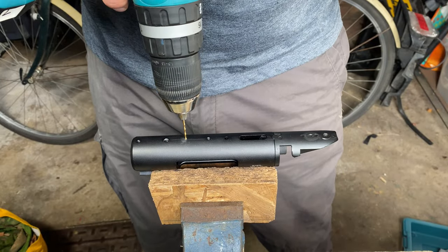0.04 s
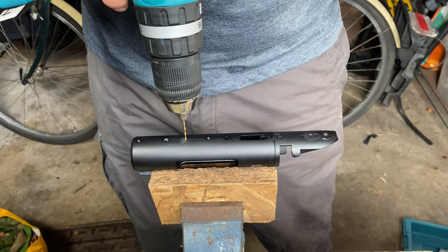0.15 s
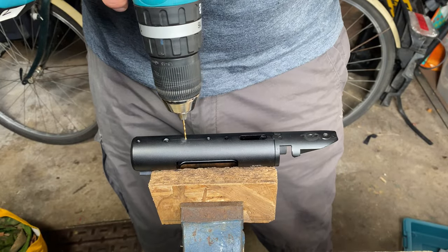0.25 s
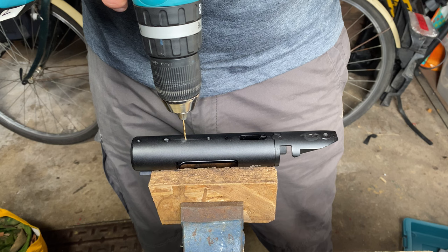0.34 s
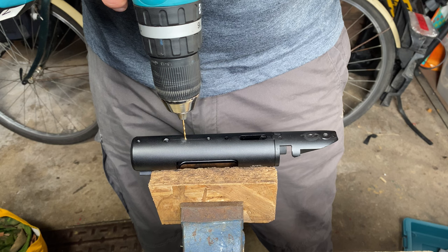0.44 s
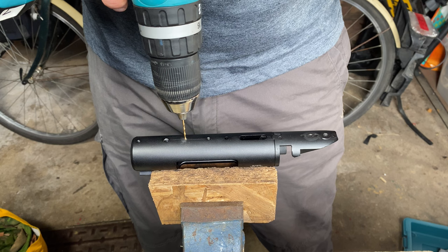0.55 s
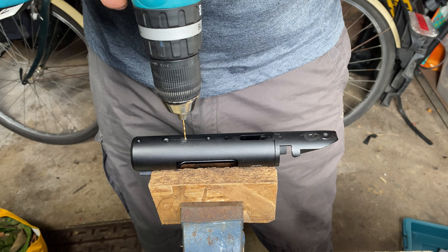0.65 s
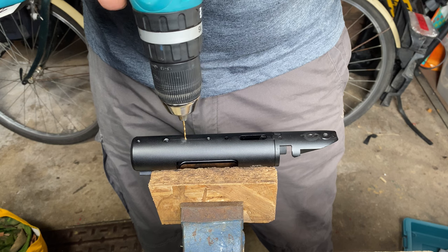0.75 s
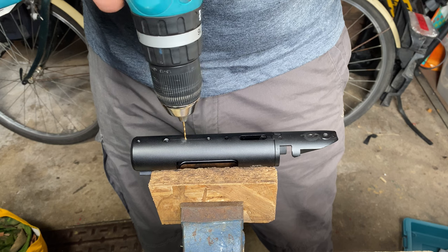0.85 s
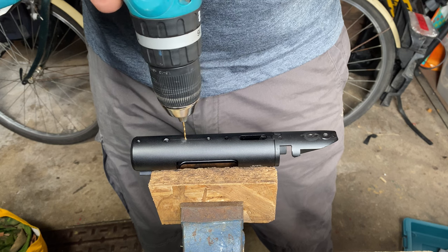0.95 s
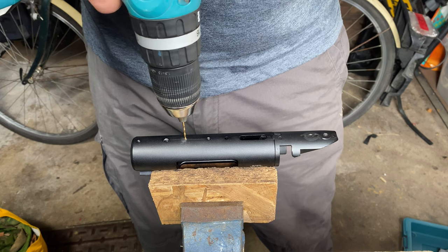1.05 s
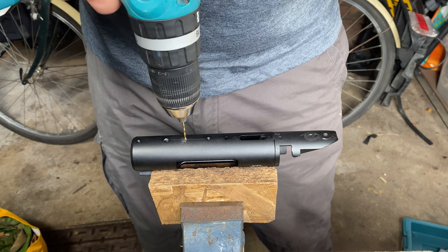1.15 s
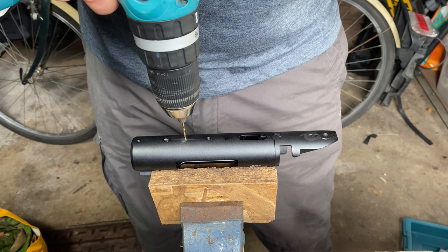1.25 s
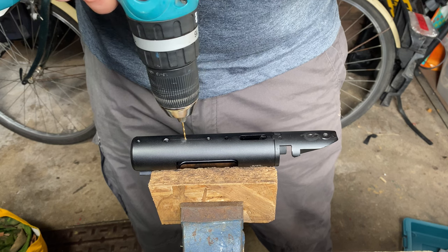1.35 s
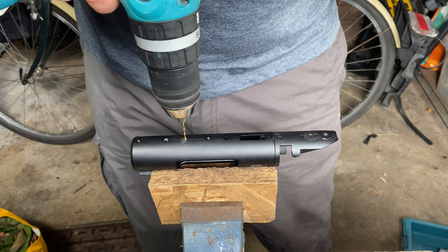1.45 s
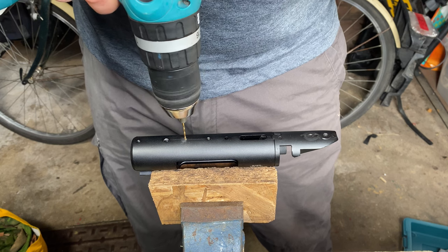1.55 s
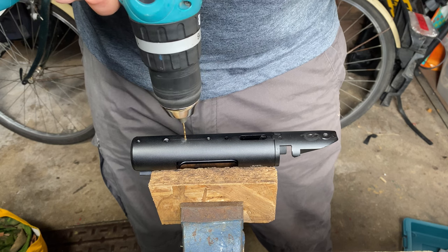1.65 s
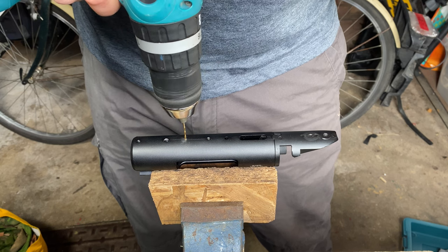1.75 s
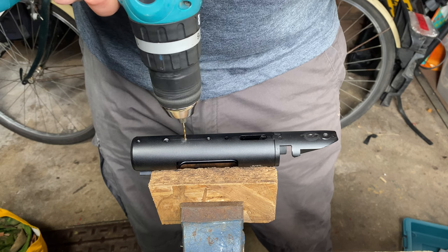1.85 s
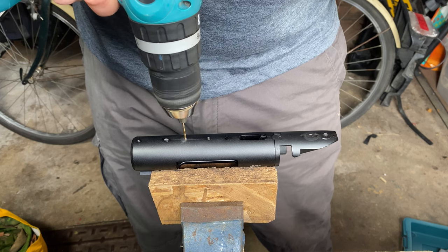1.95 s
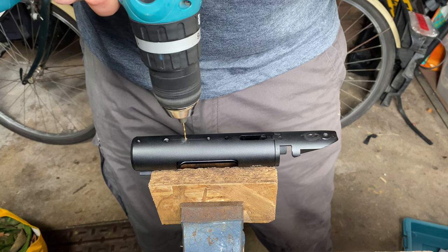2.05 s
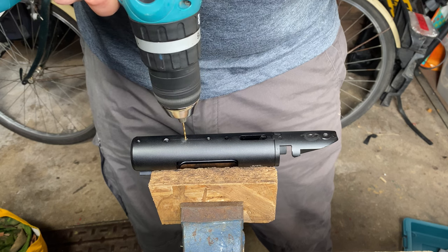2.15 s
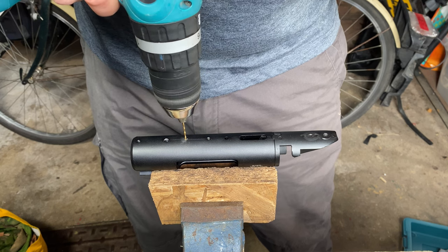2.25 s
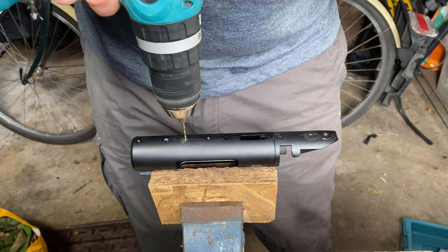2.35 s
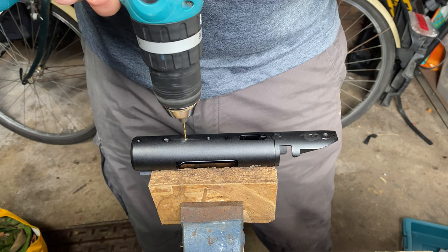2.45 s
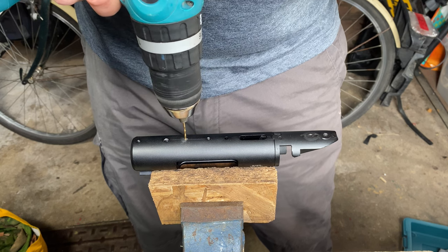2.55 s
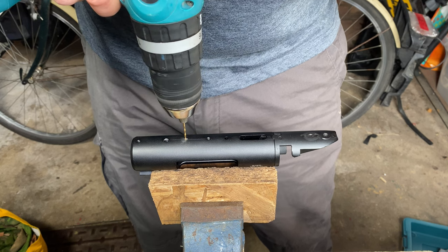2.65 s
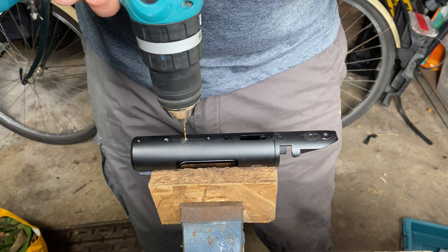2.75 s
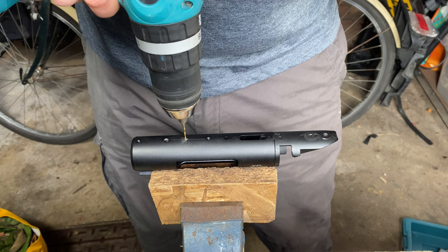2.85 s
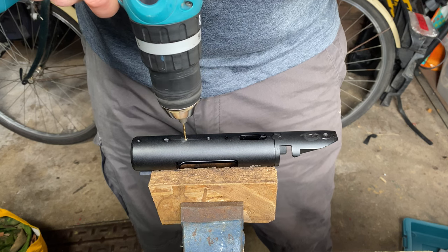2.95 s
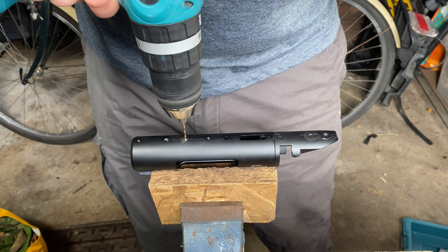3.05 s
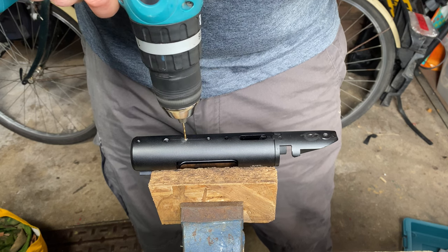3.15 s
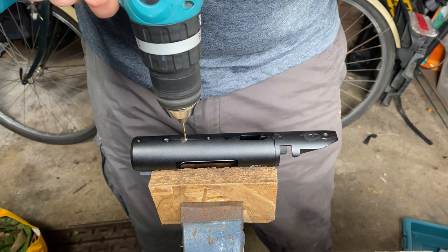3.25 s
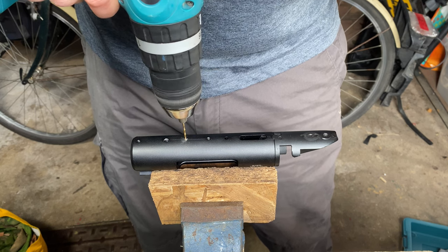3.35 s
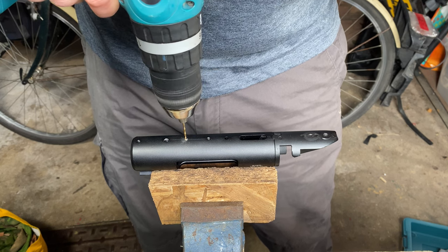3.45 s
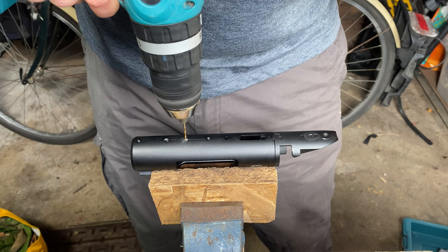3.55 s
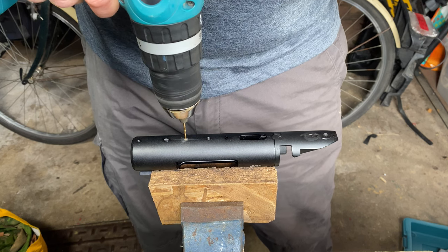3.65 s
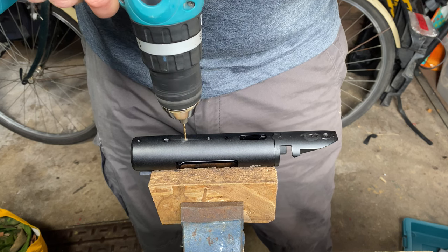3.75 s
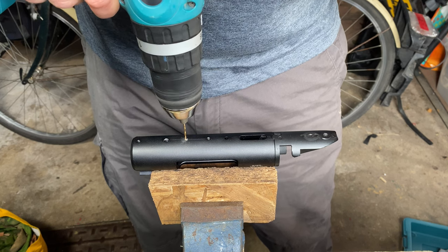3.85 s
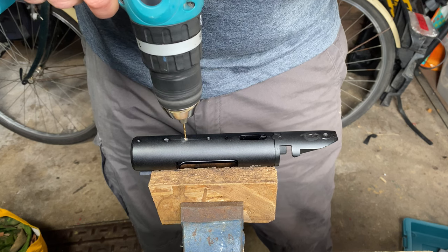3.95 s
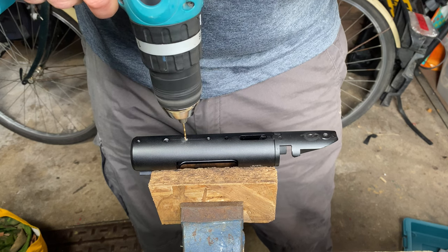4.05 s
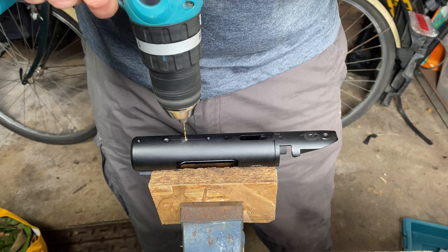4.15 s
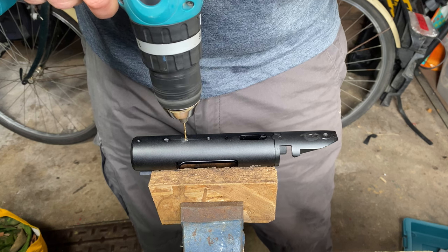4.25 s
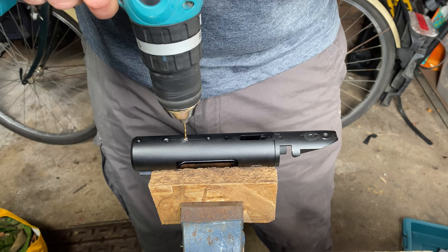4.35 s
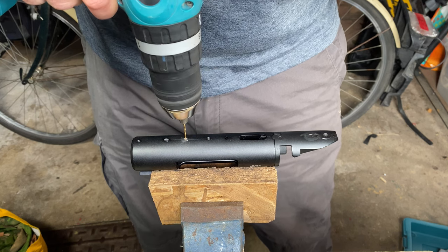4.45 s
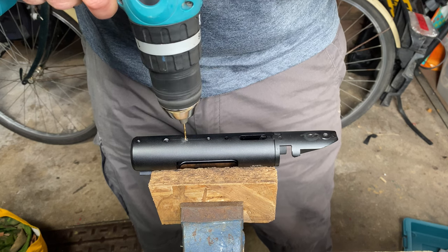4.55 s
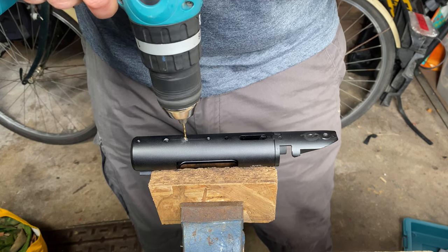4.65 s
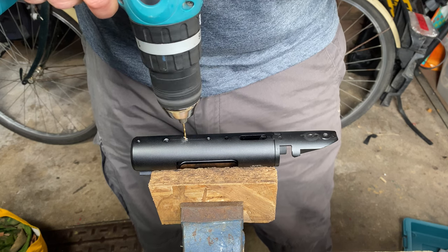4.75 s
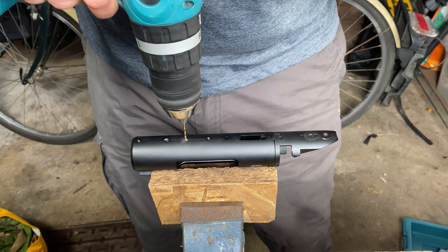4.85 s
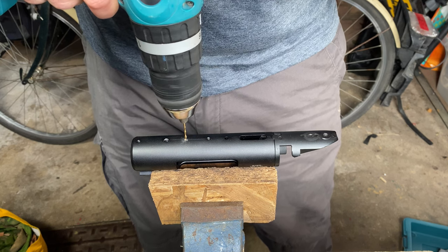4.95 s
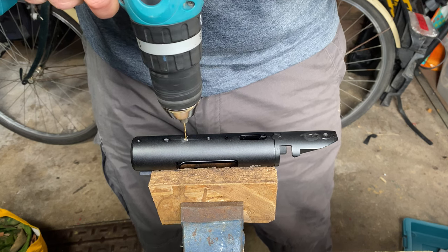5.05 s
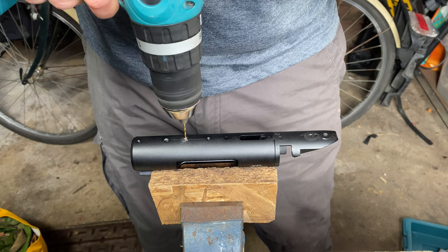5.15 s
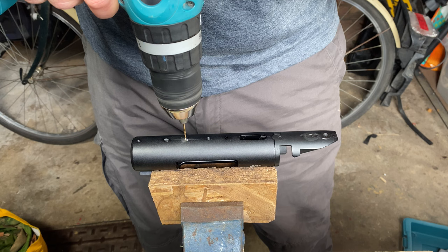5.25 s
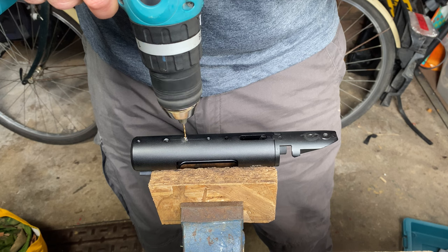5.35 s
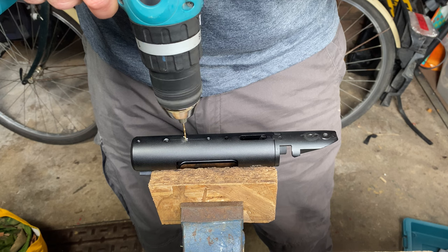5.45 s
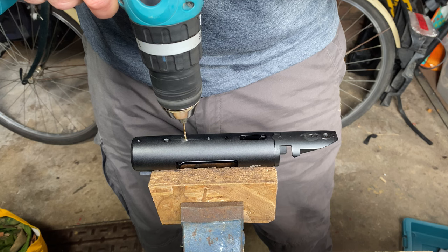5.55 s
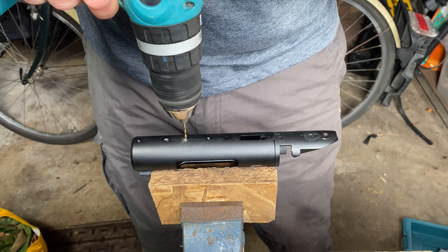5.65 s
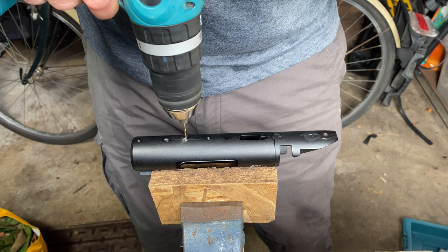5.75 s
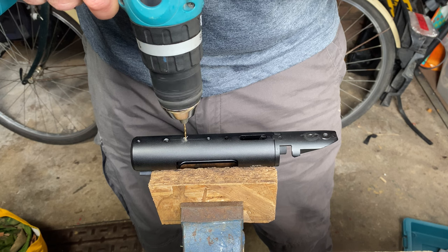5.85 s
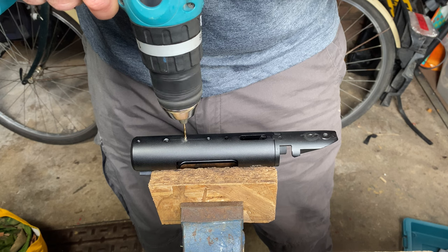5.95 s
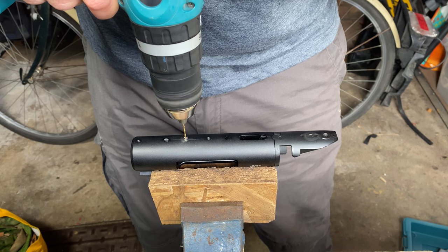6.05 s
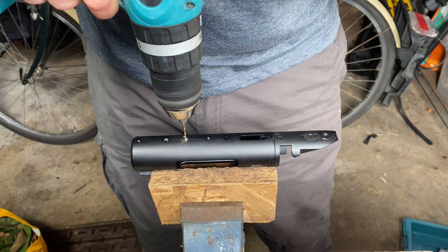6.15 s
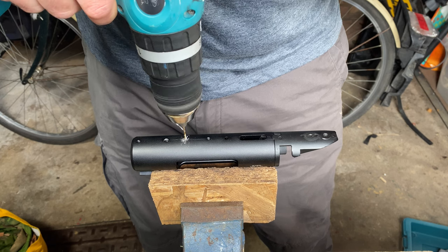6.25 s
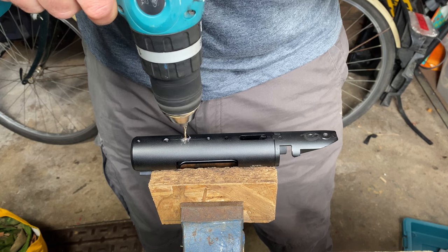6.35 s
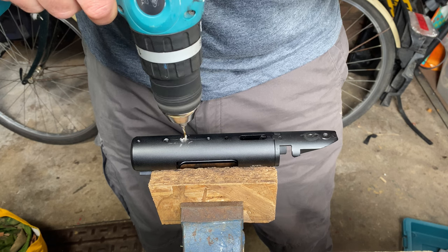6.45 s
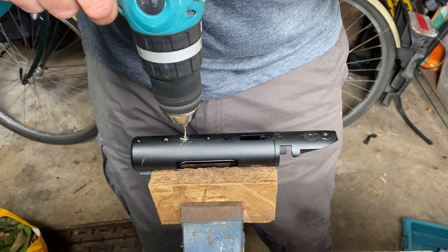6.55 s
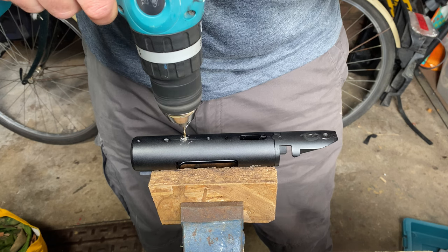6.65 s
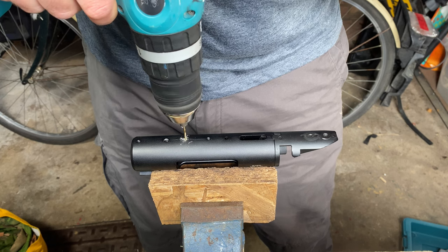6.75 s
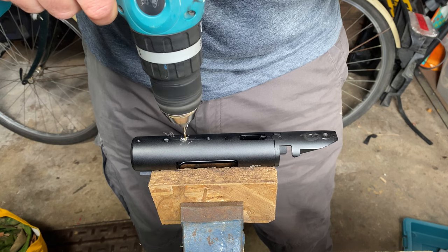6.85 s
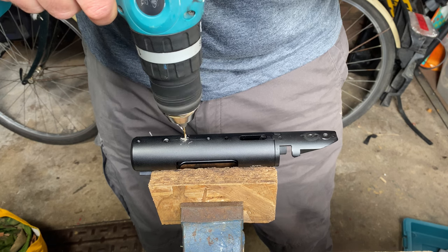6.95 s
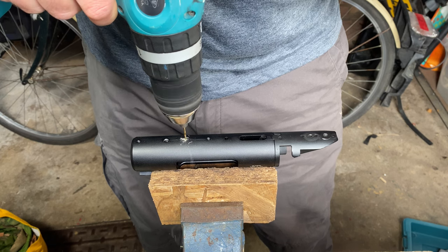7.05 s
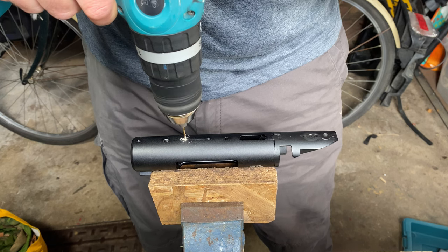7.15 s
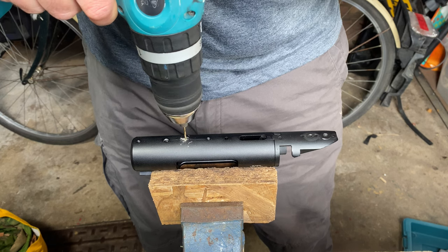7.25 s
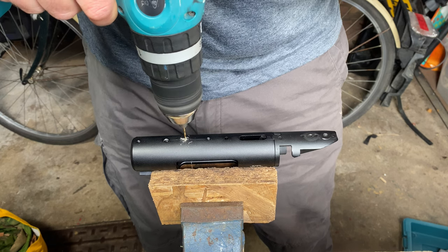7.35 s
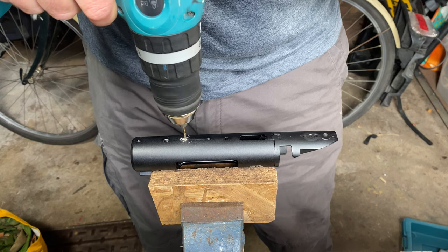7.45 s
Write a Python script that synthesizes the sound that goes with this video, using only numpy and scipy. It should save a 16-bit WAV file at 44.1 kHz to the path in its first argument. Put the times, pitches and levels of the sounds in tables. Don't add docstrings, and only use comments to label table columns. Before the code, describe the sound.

A cordless drill bores into a steel part in three speed steps, from quiet gritty buzz to bright screaming whir, over a faint workshop hum.

```python
import sys
import numpy as np
from scipy import signal
from scipy.fft import rfft, irfft, next_fast_len
from scipy.io import wavfile
from scipy.ndimage import uniform_filter1d, map_coordinates

SR = 44100
rng = np.random.default_rng(int(sys.argv[2]) if len(sys.argv) > 2 else 0)


def transcribe(signal):
    frames = np.atleast_2d(signal).T
    limited = np.clip(frames, -1, 1)
    pcm = np.round(limited * 32767).astype(np.int16)
    wavfile.write(sys.argv[1], SR, pcm)


def voltage_ratio(level):
    return 10 ** (np.asarray(level, float) / 20)


N = 330485
T = np.arange(N) / SR
START = 1.3052
STEP_S = [START, 3.44, 6.222]


def unit(x):
    return x / np.sqrt(np.mean(x ** 2) + 1e-20)


def along(points, hz):
    f, v = np.transpose(points)
    return np.interp(np.log(hz + 1), np.log(f + 1), v)


def curve(rows, axis=1):
    return np.interp(T, np.array(rows)[:, 0], np.array(rows)[:, axis])


def stepped(values):
    step = np.searchsorted(STEP_S, T) - 1
    return np.asarray(values)[np.clip(step, 0, 2)]


def wobble(rate, order=3):
    knots = rng.standard_normal(int(N * rate / SR) + 4)
    return map_coordinates(knots, [T * rate], order=order)


def filtered(x, response):
    m = next_fast_len(N + 8192)
    return irfft(rfft(x, m) * response(np.fft.rfftfreq(m, 1 / SR)), m)[..., :N]


def peak(f, hz, width):
    return 1j * f * width / (hz * hz - f * f + 1j * f * width)


def causal(points, hz):
    ceps = irfft(np.log(voltage_ratio(along(points, hz)) + 1e-6))
    half = len(ceps) // 2
    ceps[1:half] *= 2
    ceps[half + 1:] = 0
    return np.exp(rfft(ceps))


def patchy(depth_db):
    z = signal.stft(rng.standard_normal((2, N)), nperseg=512)[2]
    field = uniform_filter1d(rng.standard_normal(z.shape[1:]), size=5, axis=0)
    field = uniform_filter1d(field, size=10, axis=1)
    return signal.istft(z * voltage_ratio(depth_db * unit(field)), nperseg=512)[1][:, :N]


def air():
    # [f/Hz, level/dB]
    floor_colour = [(30, -4), (60, 0), (100, -4), (200, -16), (400, -20), (800, -25), (1600, -32),
                    (3200, -35), (6400, -39), (10000, -35), (14000, -47)]
    points = [(20, -29), (40, -13)] + floor_colour[1:] + [(16000, -80)]
    noise = filtered(rng.standard_normal((2, N)), lambda hz: voltage_ratio(along(points, hz)))
    low = filtered(noise, lambda hz: 1 / (1 + (hz / 180) ** 4))
    hiss = voltage_ratio(-70.5) * (noise - low) / np.std(low)
    running_db = (T > START) * (5 + 0.5 * (T - START))
    return unit(low) * voltage_ratio(-67 + running_db + 2.3 * wobble(6)) + hiss


def ticks():
    # [t/s, peak level/dB, low ring f/Hz, high ring level/dB, crack level/dB]
    contacts = [
        (0.004, -66, 1600, -30, -18),
        (0.2585, -33.5, 1620, -24, -17),
        (0.4245, -40, 1660, -2, -16),
        (0.864, -53, 2470, -5, -6),
        (1.179, -58, 1690, -5, -17),
        (1.204, -60, 1920, -12, -17),
        (1.248, -57, 1370, -6, -17),
        (1.374, -39, 1700, -10, -10),
        (1.382, -47, 2500, 0, 9),
    ]
    t60_s, rise_s = .02, .0013
    out, t = np.zeros(N + SR), np.arange(SR // 8) / SR
    f = np.fft.rfftfreq(len(t), 1 / SR)
    for s, db, hz, high_db, crack_db in contacts:
        envelope = voltage_ratio(-60 * t / t60_s) * (1 - np.exp(-t / rise_s))
        burst = rfft(envelope * rng.standard_normal(len(t)))
        low_ring = peak(f, hz, 170) * voltage_ratio(20)
        high_ring = peak(f, 3900, 900) * voltage_ratio(high_db + 14)
        crack = voltage_ratio(crack_db + 4) * (peak(f, 2500, 3500) + .25 + 1.3 * peak(f, 12500, 2500))
        out[round(s * SR):][:len(t)] += voltage_ratio(db) * irfft(burst * (low_ring + high_ring + crack), len(t))
    return out[:N]


def shop(x):
    # [f/Hz, t60/s]
    decay = [(200, .35), (2000, .3), (4200, .3), (10000, .14)]
    hz, t, z = signal.stft(rng.standard_normal((2, SR // 2)), SR, nperseg=256)
    fade = voltage_ratio(-60 * t / along(decay, hz)[:, None])
    tail = signal.istft(z * fade, SR, nperseg=256)[1]
    return signal.fftconvolve(x[None], tail / np.linalg.norm(tail[0]), axes=1)[:, :N]


def knocks():
    # [t/s, level/dB, first f/Hz, last f/Hz, t60/s]
    blows = [
        (0.268, -43, 360, 56.5, 0.41),
        (0.434, -49, 346, 59.7, 0.28),
        (0.87, -50, 295, 69.6, 0.2),
        (1.129, -64, 150, 67.5, 0.083),
        (1.655, -40.5, 260, 60.6, 0.6),
        (2.221, -30.5, 509, 107, 0.15),
        (3.885, -35.5, 254, 93, 0.19),
    ]
    out, t = np.zeros(N + SR), np.arange(SR // 2) / SR
    wood = signal.butter(2, [150, 800], "bandpass", fs=SR)
    for s, db, first_hz, last_hz, t60 in blows:
        hz = last_hz + (first_hz - last_hz) * np.exp(-t / 0.013)
        hz = hz * (1 + 0.18 * wobble(60, order=1)[:len(t)])
        wave = np.sin(2 * np.pi * np.cumsum(hz) / SR)
        rough = unit(signal.lfilter(*wood, rng.standard_normal(len(t))))
        thud = voltage_ratio(-0.5 - 60 * t / 0.11) * rough
        envelope = voltage_ratio(db - 60 * t / t60) * (1 - np.exp(-t / 0.011))
        out[round(s * SR):][:len(t)] += envelope * (wave + thud)
    return out[:N]


def squeak():
    # [t/s, f/Hz, level/dB]
    glide = [(0.88, 10163, -85), (0.94, 10063, -94), (0.962, 10432, -83), (0.992, 10722, -92),
             (1.084, 10200, -84), (1.09, 9999, -97)]
    on = np.clip(np.minimum(T - glide[0][0], glide[-1][0] - T) / .01, 0, 1)
    tone = np.sin(2 * np.pi * np.cumsum(curve(glide)) / SR)
    return on * voltage_ratio(curve(glide, axis=2) + 10) * tone


def kicks(angle):
    rate_hz = 118.44
    s = np.arange(START, STEP_S[2], 1 / rate_hz)
    pole = 5 * angle[(s * SR).astype(int)]
    size = (1 + .3 * np.cos(pole)) * voltage_ratio(.8 * rng.standard_normal(len(s)))
    at = (s - .00004 * np.sin(pole)) * SR
    train, left = np.zeros(N), at.astype(int)
    train[left] = size * (left + 1 - at)
    train[left + 1] = size * (at - left)
    return train


def thuds(train, angle, share):
    # [f/Hz, level/dB]
    plain_colour = [(237, -13), (355, -17), (474, -3), (592, 0), (711, -3), (947, -3), (1184, -6),
                    (1303, -3), (1421, -11), (1600, -3), (1776, -9), (2013, -3), (2250, -18), (3500, -45)]
    # [f/Hz, level/dB]
    raised_colour = [(400, -40), (600, -16), (720, -5), (950, 0), (1080, -1), (1170, -11), (1290, -4),
                     (1500, -13), (2000, -10), (2200, -25), (3000, -50)]
    kick_db = [-49, -46.5, -46.5]
    surge_db = [-7, 1.5, 0]

    def spread(hz):
        return np.exp(-1.6j * np.sqrt(hz))

    plain = filtered(train, lambda hz: spread(hz) * causal([(60, -40)] + plain_colour, hz))
    raised = np.real(signal.hilbert(train, next_fast_len(N))[:N] * np.exp(5j * angle))
    raised = filtered(raised, lambda hz: spread(hz) * causal(raised_colour, hz)) * (1 - share[2])
    jolt_db = stepped(surge_db) * np.exp(-np.abs(T - stepped(STEP_S)) / .06)
    sharp = (unit(plain) + voltage_ratio(-4.5) * unit(raised)) * voltage_ratio(stepped(kick_db) + jolt_db)
    dull = filtered(sharp, lambda hz: 1 - .55 / (1 + (1400 / (hz + 1)) ** 8))
    return share[0] * sharp + (1 - share[0]) * dull


def body(f):
    # [f/Hz, width/Hz, level over the broad colour/dB]
    modes = [(464, 21, 4.5), (677, 23, -1.5), (863, 14, 1), (1027, 38, -0.5), (2840, 54, -6),
             (3970, 36, -1), (4506, 170, -8.5), (5030, 100, -7.5), (5517, 91, -1), (6160, 85, -6)]
    # [f/Hz, width/Hz, depth 0-1]
    dips = [(1480, 120, .5), (2300, 170, .55), (2650, 350, .33), (3290, 110, .7), (3820, 170, .6),
            (5170, 120, .5), (5760, 120, .45)]
    gain = 1 + sum(voltage_ratio(db) * peak(f, c, w) for c, w, db in modes)
    cuts = [1 - np.clip(depth, 0, .9) * peak(f, c, w) for c, w, depth in dips]
    return gain * np.prod(cuts, axis=0)


def steel_ring(rattle):
    # [f/Hz, width/Hz, level/dB]
    modes = [(3438, 30, 1.5), (3520, 140, -9)]
    noise = rattle * rng.standard_normal((2, N))
    return unit(filtered(noise, lambda hz: sum(voltage_ratio(db) * peak(hz, c, w) for c, w, db in modes)))


def chatter(teeth):
    seated = np.clip((T - 1.89) / .04, 0, 1)
    jaws = unit(filtered(teeth, lambda hz: peak(hz, 2490, 470) ** 2))
    return jaws * voltage_ratio(-54.5 - 8 * seated)


def grind(train, share):
    # [f/Hz, level per Hz/dB]
    slow_colour = [(200, -10.5), (420, -10), (650, -7.5), (1000, -1), (1400, -2), (2200, -1), (3000, -1.5),
                   (3850, -1.5), (4800, -6), (6200, -8.5), (7600, -13), (9000, -16), (11500, -16),
                   (14500, -19)]
    middle_colour = [(200, -11), (420, -12.5), (650, -6.5), (1000, -2.5), (1400, -0.5), (2200, -2.5),
                     (3000, -0.5), (3850, -0.5), (4800, 1), (6200, -1.5), (7600, -7.5), (9000, -10.5),
                     (11500, -10), (14500, -11)]
    fast_colour = [(200, -13.5), (420, -14), (650, -6.5), (1000, -3.5), (1400, -0.5), (2200, -2.5),
                   (3000, 2), (3850, -7), (4800, 2), (6200, -1), (7600, -5.5), (9000, -3.5), (11500, -6),
                   (14500, -7)]
    # [grind level/dB, drift/dB per s, steel ring level/dB, ring shortfall at first/dB]
    loads = [
        (-43.5, 3, -57, 3),
        (-32.5, -0.63, -37, 11),
        (-22.5, -0.76, -26, 1.5),
    ]
    # [t/s, level/dB]
    press = [(1.42, 1), (2.1, -1), (2.25, .5), (2.62, -1), (3.0, 0.7), (3.4, -0.5), (3.72, 0.7), (4.3, -.5),
             (6.2, 0), (7.15, -0.5), (7.35, 2)]
    flare = np.abs(signal.lfilter([1], [1, -np.exp(-1 / (.002 * SR))], train))
    slack = 0.4 * share[0] + 0.2 * share[1] + 3.5 * np.exp(-(np.abs(T - START) / 0.06) ** 2)
    rattle = voltage_ratio(0.57 * wobble(35) + 1.04 * wobble(400) + 0.35 * wobble(9))
    teeth = patchy(depth_db=0.19) * (1 + slack * flare) * rattle
    housed = filtered(teeth, body)
    out = np.zeros((2, N))
    for w, colour in zip(share, (slow_colour, middle_colour, fast_colour)):
        points = [(40, -32)] + colour + [(15600, -46)]
        c = filtered(housed, lambda hz: voltage_ratio(along(points, hz)))
        out += w * c / np.sqrt(np.mean(w * c ** 2) / np.mean(w))
    since = np.abs(T - stepped(STEP_S))
    grind_db, drift, ring_db, shortfall_db = (stepped(c) for c in np.transpose(loads))
    spin_up_db = 13 * (T < 1.3385) - curve(press)
    out *= voltage_ratio(grind_db + drift * since - spin_up_db - 1.5)
    bite_db = ring_db - shortfall_db * np.exp(-since / .55)
    out += steel_ring(rattle) * voltage_ratio(bite_db - 2 - 9 * share[2])
    return out + chatter(teeth) * voltage_ratio(-spin_up_db) * share[0]


def whine(angle, share):
    multiples = [.657, 2, 3.6, 5, 6, 10, 10.6, 11.33, 15, 19.9, 20, 24, 25, 30, 32, 35, 37, 38, 40, 43, 49,
                 45, 48, 51, 50]
    slow_levels = [-90, -90, -67, -90, -90, -66, -58, -90, -90, -57] + [-90] * 15
    middle_levels = [-90, -90, -62, -69, -90, -63, -90, -54, -47, -90, -60, -90, -57, -63, -90, -70, -90,
                     -90, -90, -90, -90, -90, -90, -90, -90]
    fast_levels = [-60.5, -50, -73, -41.5, -51, -47.5, -90, -90, -31, -90, -62, -39.5, -41, -36, -49, -38,
                   -44, -40, -35, -48, -42, -41, -43, -46, -44]
    rise = np.clip((T - 6.6) / .05 + .5, 0, 1)
    swell = share[2] * voltage_ratio(-5 + 6 * rise - 35 * np.maximum(T - 7.3, 0))
    thin = share[2] * voltage_ratio(-7 * np.clip((T - STEP_S[2]) / .6, 0, 1))
    slow = share[0] ** 8 * np.clip((T - START) / .9, 0, 1)
    middle = share[1] ** 8
    out = np.zeros(N)
    for k, slow_db, mid_db, fast_db in zip(multiples, slow_levels, middle_levels, fast_levels):
        fast = swell if k < 25 or k == 40 else thin
        level = slow * voltage_ratio(slow_db) + middle * voltage_ratio(mid_db) + fast * voltage_ratio(fast_db)
        tone = np.sin(k * angle + .3 * wobble(20, order=1))
        out += level * (1.4 + .2 * wobble(10, order=1)) * tone
    return out


def drill():
    # [t/s, turns per s]
    speed_path = [(1.3, 40), (1.4, 41.5), (1.6, 43.05), (3.42, 43.05), (3.5, 80), (3.6, 79.2), (5.0, 79.4),
                  (6.219, 79.6), (6.222, 233), (6.52, 232.2), (7.32, 228.9), (7.49, 225.3)]
    step_speeds = [43, 79.4, 230]
    speed = curve(speed_path)
    angle = 2 * np.pi * np.cumsum(speed * (1 + .0007 * wobble(25))) / SR
    share = [np.interp(speed, step_speeds, row) for row in np.eye(3)]
    train = kicks(angle)
    tone = thuds(train, angle, share) + whine(angle, share)
    echo = np.pad(tone, (round(0.0055 * SR), 0))[:N]
    return (grind(train, share) + [tone, echo]) * np.clip((T - START) / 0.0044, 0, 1)


def ports(direct, diffuse):
    # [f/Hz, likeness 0-1]
    alike = [(60, 0.98), (300, 1), (700, 0.91), (1400, 1), (2500, 0.79), (3400, 0.98), (5300, 0.83),
             (6900, 0.76), (8000, 1), (14000, 1)]
    # [f/Hz, phase/rad]
    left_lead = [(60, 0.16), (400, 0.72), (1200, 0.9), (2000, 0.47), (2900, -0.93), (4100, -0.62),
                 (5200, -1.04), (6300, -0.21)]
    # [f/Hz, level/dB]
    balance = [(60, -3.5), (300, 1), (1000, -1.4), (2000, -1), (2600, -7), (3600, -1.5), (4800, -5),
               (6500, -3.5), (7100, 0.5), (8500, 0)]

    def response(hz):
        turn = np.arccos(np.clip(along(alike, hz), 0, 1)) / 2
        lead = np.where(hz < 6300, along(left_lead, hz), 2 * np.pi * (hz / 6000 - 1))
        half = voltage_ratio(along(balance, hz) / 2) * np.exp(.5j * lead)
        return np.array([half * np.cos(turn), np.cos(turn) / half,
                         half * np.sin(turn), -np.sin(turn) / half])

    out = filtered(np.array([direct, direct, diffuse, diffuse]), response)
    return out[:2] + out[2:]


def scene():
    tick = ticks()
    small = np.array([tick + knocks() + squeak(), np.zeros(N)])
    small = small + voltage_ratio(-13) * shop(tick)
    direct, diffuse = drill() + small + air()
    return ports(direct, diffuse)


def roll_off(x):
    return signal.sosfilt(signal.butter(12, 15140, fs=SR, output="sos"), x)


def record(dry):
    return roll_off(dry)


dry = scene()
out = record(dry)
transcribe(out)
```